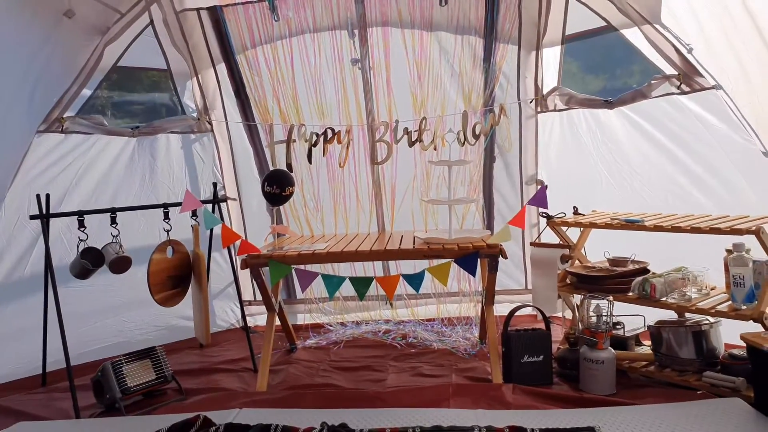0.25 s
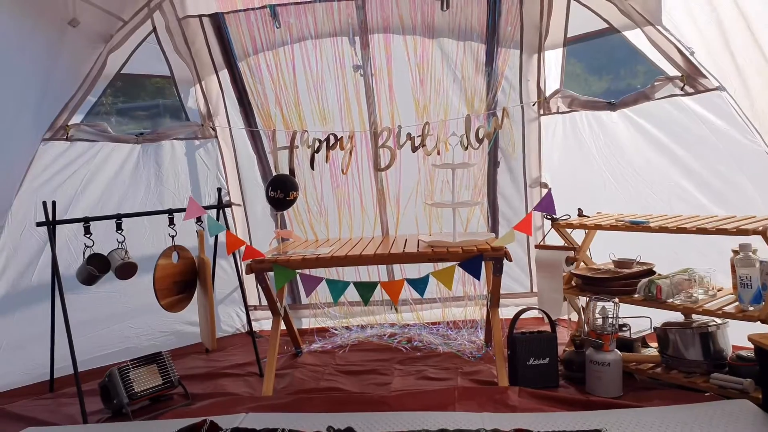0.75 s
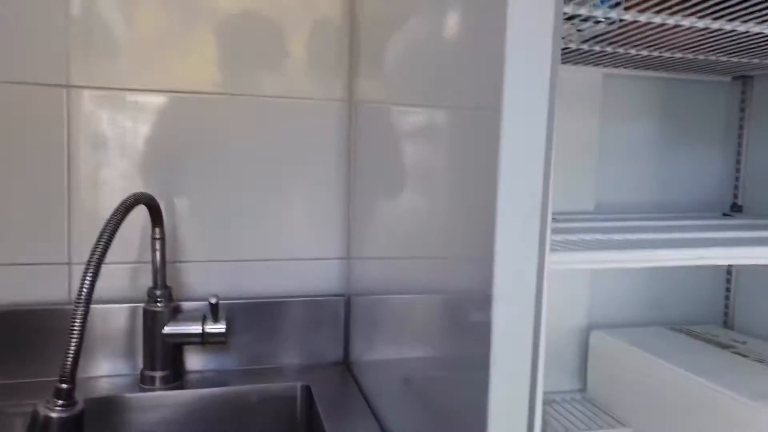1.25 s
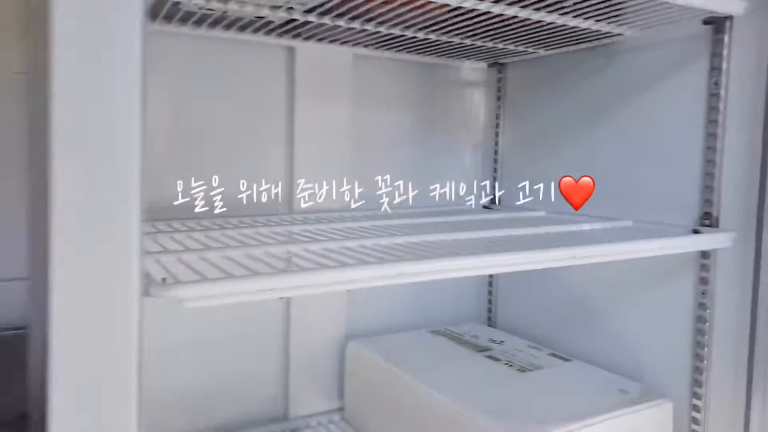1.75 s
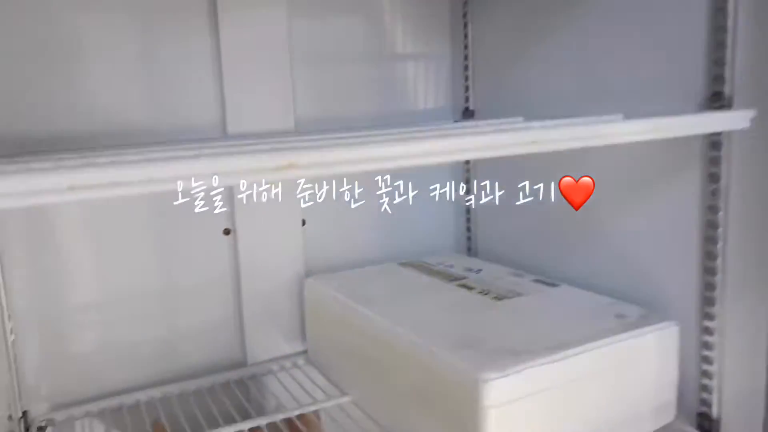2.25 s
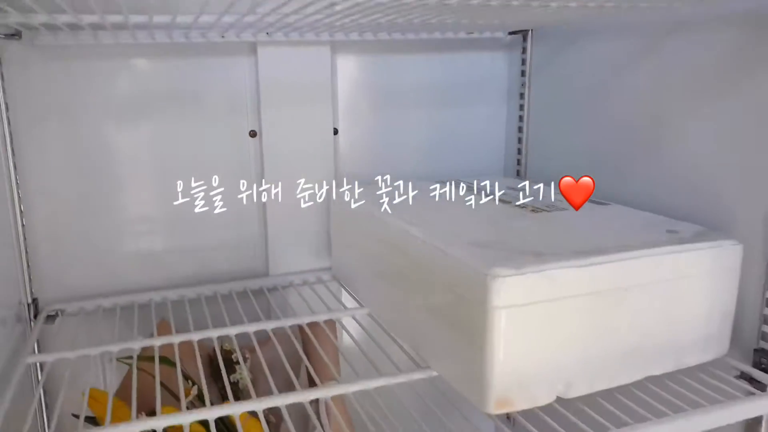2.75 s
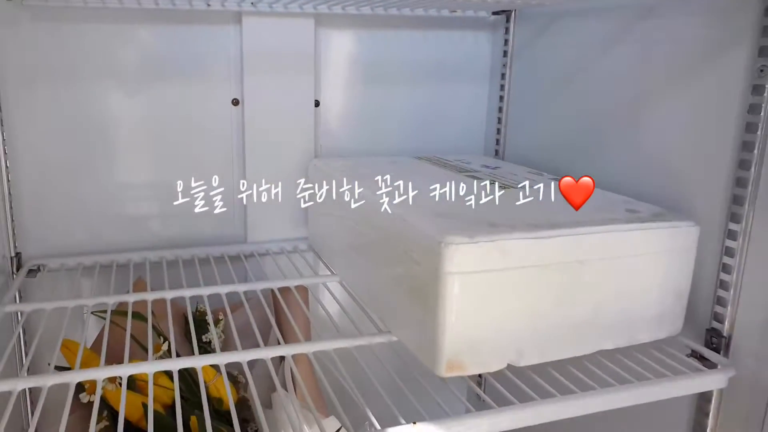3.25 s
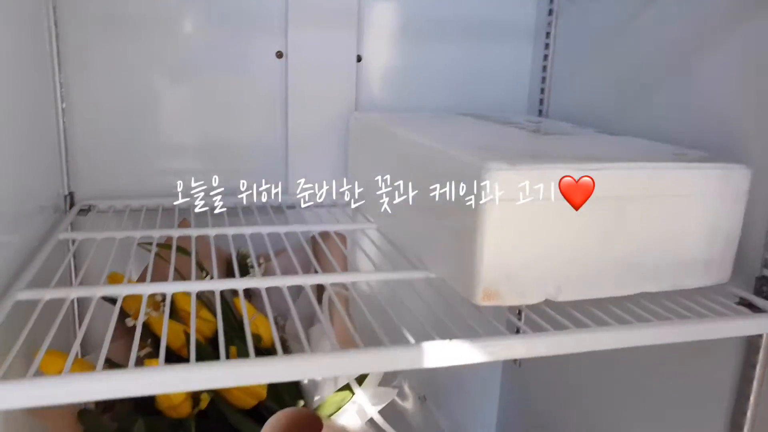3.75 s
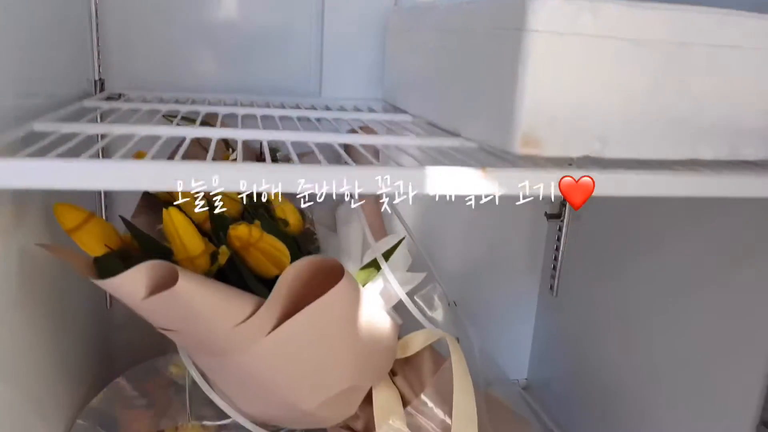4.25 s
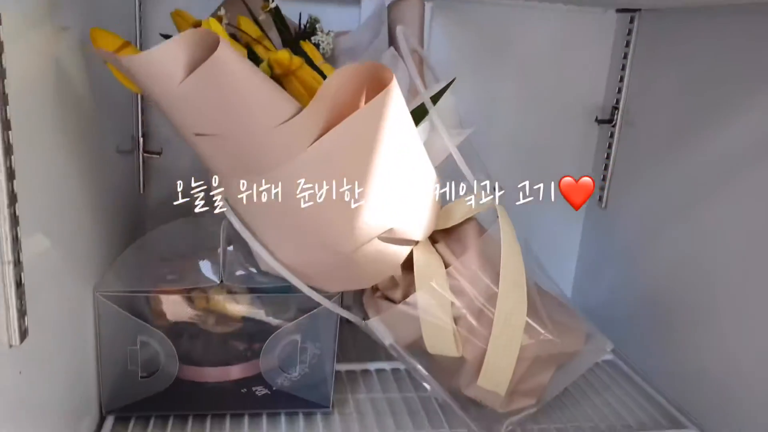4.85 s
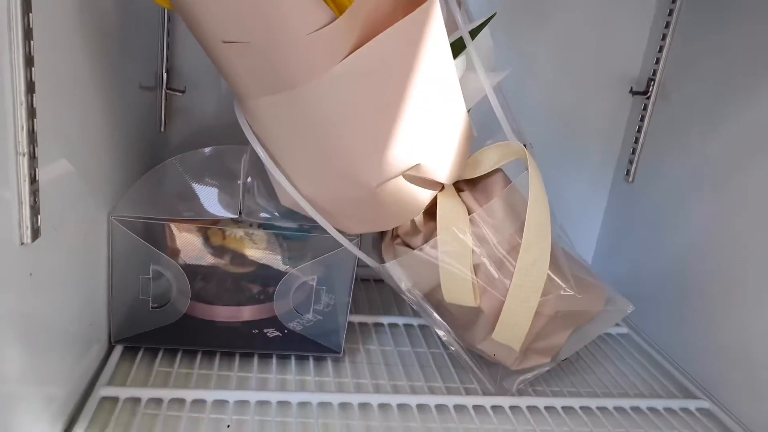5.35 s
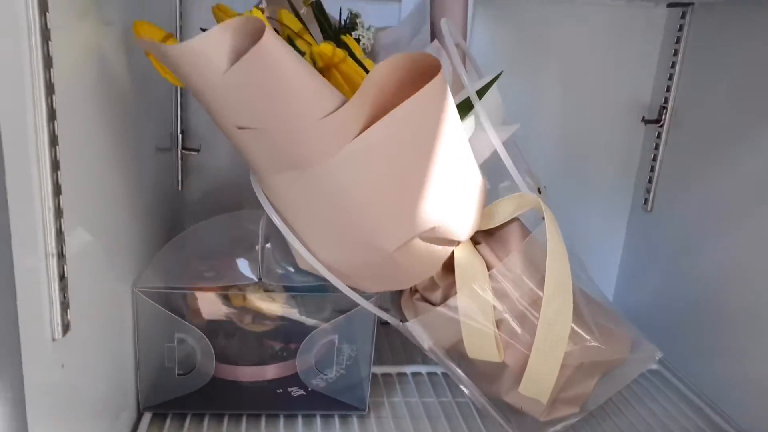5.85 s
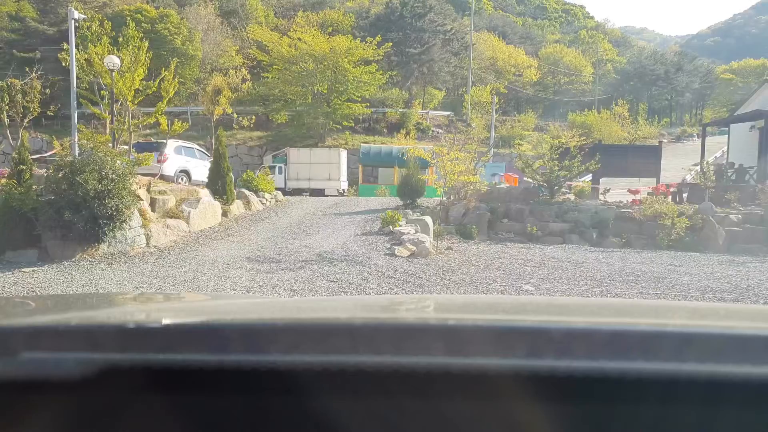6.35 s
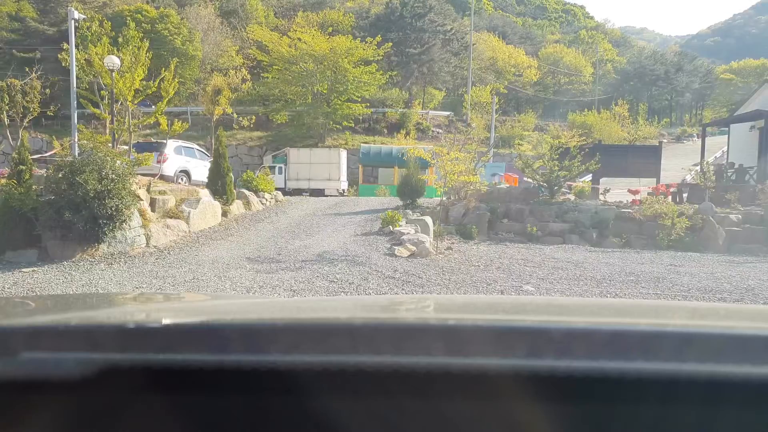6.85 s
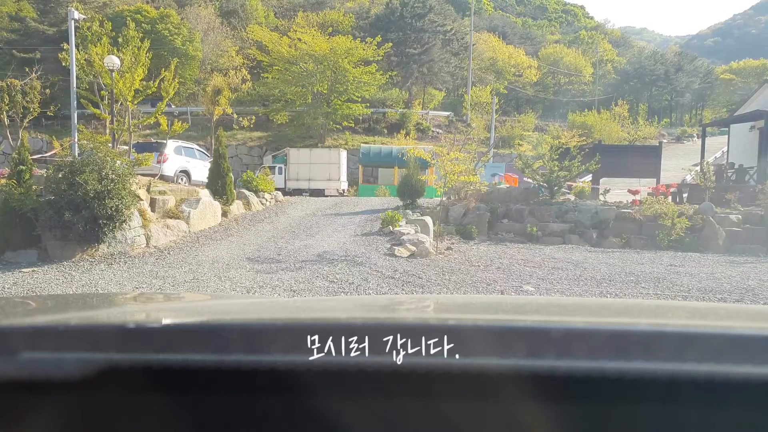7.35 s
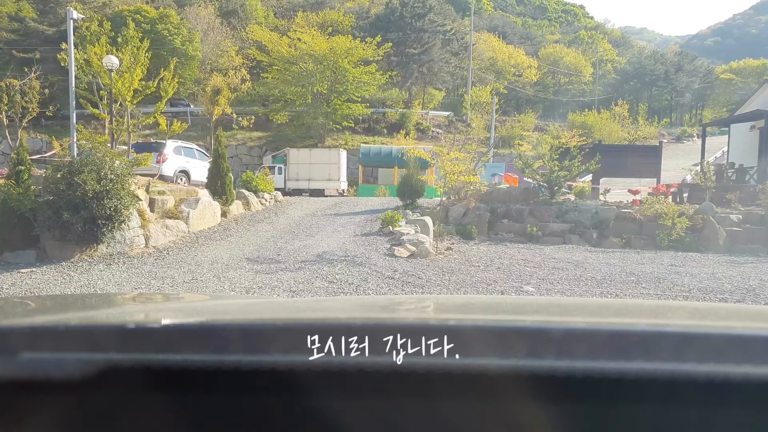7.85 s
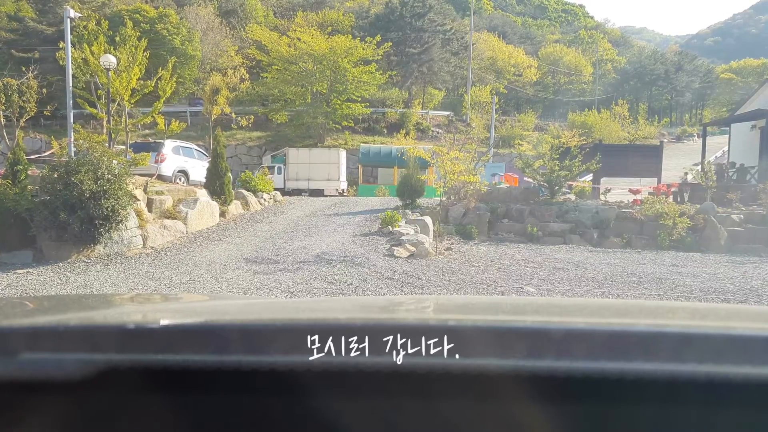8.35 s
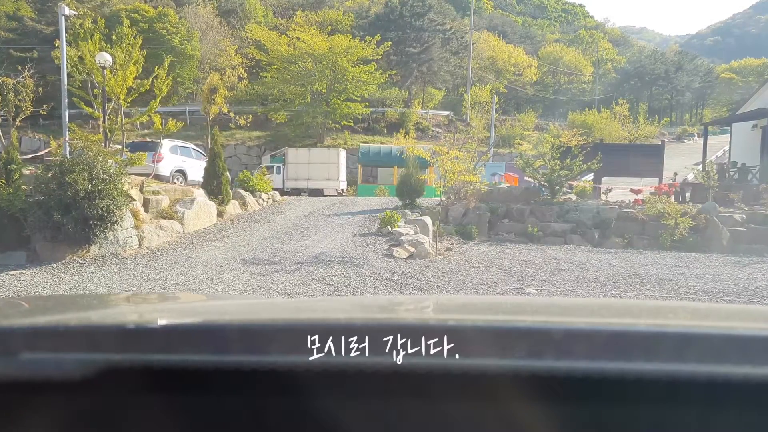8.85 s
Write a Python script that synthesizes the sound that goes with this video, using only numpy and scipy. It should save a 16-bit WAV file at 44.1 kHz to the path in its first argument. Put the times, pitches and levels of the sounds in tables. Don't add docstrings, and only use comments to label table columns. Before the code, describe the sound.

Handheld stereo microphone, three places cut hard together. First a quiet tent, wind puffs thumping the left side over a far murmur and tiny fabric ticks. Then the mic moves into an open commercial refrigerator: loud boomy compressor hum, fan tones and rushing air. Finally a parked car cabin, engine idling low while someone settles with rustle and padded thuds, clicks a switch, and the engine revs once and falls back.

```python
import sys
import numpy as np
from scipy import signal
from scipy.fft import rfft, irfft, next_fast_len
from scipy.io import wavfile
from scipy.ndimage import uniform_filter1d

SR = 44100
rng = np.random.default_rng(int(sys.argv[2]) if len(sys.argv) > 2 else 0)


def magnitude_from_level(level_db):
    exponent = np.asarray(level_db, float) / 20
    return 10 ** exponent


def bounce(signal):
    frames = np.transpose(np.atleast_2d(signal))
    limited = np.clip(frames, -1, 1)
    pcm = np.round(limited * 32767).astype(np.int16)
    wavfile.write(sys.argv[1], SR, pcm)


N = 400869
TIME = np.arange(N) / SR
PADDED = next_fast_len(N)
HZ = np.maximum(np.arange(PADDED // 2 + 1) * SR / PADDED, 1)
TO_FRIDGE_S, TO_CAR_S = 1.023, 5.852


def in_time(rows):
    s, *columns = np.transpose(rows)
    return [np.interp(TIME, s, column) for column in columns]


def at_hz(points):
    hz, value = np.transpose(points)
    return np.interp(np.log(HZ), np.log(hz), value)


def rms_one(x):
    return x / np.sqrt(np.mean(x ** 2) + 1e-20)


def bump(centre_s, width_s):
    return np.exp(-((TIME - centre_s) / width_s) ** 2)


def resonance_db(hz, modes):
    return sum(db / (1 + (2 * (hz - top_hz) / width) ** 2) for top_hz, width, db in modes)


def drift(rate):
    r = np.exp(-80 * np.pi * rate / SR)
    coarse = rng.standard_normal(N // 40 + 2002)
    slow = signal.lfilter([1], [1, -2 * r, r * r], coarse)[2000:]
    return np.interp(np.arange(N) / 40, np.arange(len(slow)), rms_one(slow))


def port_gains(left_db, right_db):
    return magnitude_from_level(np.array([[left_db], [right_db]]))


def at_ports(x, lead_s):
    return np.array([np.interp(TIME + shift, TIME, x) for shift in (lead_s / 2, -lead_s / 2)])


def stereo_noise(colour_db, likeness, edges_hz=(), lead=0):
    opposite = np.array([[1], [-1]])
    mid, side = rfft(rng.standard_normal((2, PADDED))) * magnitude_from_level(colour_db)
    alike = np.clip(likeness, -.999, .999)
    pair = np.sqrt(1 + alike) * mid + np.sqrt(1 - alike) * side * opposite
    pair = pair * np.exp(.5j * lead * opposite)
    below = [0] + [1 / (1 + (HZ / edge) ** 8) for edge in edges_hz] + [1]
    return [rms_one(irfft(pair * (top - low), PADDED)[:, :N]) for low, top in zip(below, below[1:])]


def tone(hz, level_db, wobble_db=1.5, waver=.002, rate=3.0):
    turns = np.cumsum(hz * (1 + waver * drift(rate))) / SR + rng.random()
    return np.sqrt(2) * magnitude_from_level(level_db + wobble_db * drift(rate)) * np.sin(2 * np.pi * turns)


def strike(events, modes, spread_db):
    at = [min(round(row[0] * SR), N - 1) for row in events]
    hit_db = np.array(events)[:, 1]
    chance = rng.standard_normal((len(at), len(modes)))
    out = np.zeros(N)
    for k, (hz, level_db, t60) in enumerate(modes):
        clicks = np.full(N, 1e-18)
        clicks[at] = magnitude_from_level(hit_db + level_db + spread_db * chance[:, k]) * (-1) ** k
        r, w = magnitude_from_level(-60 / (t60 * SR)), 2 * np.pi * hz / SR
        out += signal.lfilter([0, np.sin(w)], [1, -2 * r * np.cos(w), r * r], clicks)
    return out


def bursts(times, levels_db, t60):
    clicks = np.full(N, 1e-18)
    clicks[np.minimum(np.round(np.array(times) * SR).astype(int), N - 1)] = magnitude_from_level(np.array(levels_db))
    return signal.lfilter([1], [1, -magnitude_from_level(-60 / (t60 * SR))], clicks)


# frequency [Hz], density [dB per Hz].
TENT_AIR = [(100, -6), (200, 0), (300, -1), (380, -8), (700, -11), (1100, -14), (2000, -19), (2600, -28),
            (4000, -33), (7000, -38), (8500, -33), (15900, -34)]
# frequency [Hz], likeness [-1 to 1].
TENT_LIKENESS = [(60, 0.39), (180, 1), (550, 0.63), (1650, 0.63), (4970, 0.01), (15000, 0.01)]
# start [s], peak level [dB].
TENT_TICKS = [
    (0.2409, -53),
    (0.2708, -59),
    (0.3656, -73),
    (0.5082, -55.5),
]


def tent_air():
    murmur, canvas, hiss = stereo_noise(at_hz(TENT_AIR), at_hz(TENT_LIKENESS), edges_hz=[900, 4500])
    lull_db = -5.5 * bump(0.49, 0.083)
    rise_db = 6 * np.minimum(TIME, TO_FRIDGE_S)
    murmur_db = -55 + lull_db + rise_db + 8.0 * np.exp(-TIME / .05) + 3.2 * drift(8.3)
    canvas_db = -65.5 + lull_db + 8 * np.exp(-TIME / .2) + 1.5 * drift(14)
    ticks = bursts(*np.transpose(TENT_TICKS), t60=0.028)
    hiss = hiss * (magnitude_from_level(-69) + 0.37 * ticks) * port_gains(1.5, -1.5)
    return murmur * magnitude_from_level(murmur_db) + canvas * magnitude_from_level(canvas_db) + hiss


# start [s], peak level [dB].
PUFFS = [(.058, -28), (.105, -33.5), (.275, -38), (0.319, -42), (0.368, -34.5), (.405, -46), (0.459, -42),
         (.495, -43), (0.524, -36), (0.556, -31), (0.639, -33.5), (0.784, -35), (.875, -32), (0.892, -41)]
# frequency [Hz], level [dB], t60 [s].
PORT = [(58, 0.5, 0.2), (86.4, -7, 0.12)]


def wind():
    breeze_colour = [(20, -30), (50, -8.0), (75, 9.0), (130, 3), (300, -37.5)]
    breeze, = stereo_noise(at_hz(breeze_colour), 0.36)
    wake = magnitude_from_level(-55.5) + magnitude_from_level(-28) * 4 * bursts(*np.transpose(PUFFS), t60=0.1)
    soften = signal.butter(4, 200, fs=SR, output="sos")
    gusts = signal.sosfilt(soften, strike(PUFFS, PORT, spread_db=5.0))
    return breeze * wake + gusts * port_gains(-2.5, -13.0)


def tent():
    return tent_air() + wind()


# time [s], place [0 beside the door, 1 doorway, 2 upper, 3 lower shelf].
PATH = [(1.03, 0.0), (1.3, 0.75), (1.6, 1.05), (2.2, 2), (3.0, 2.5), (4.1, 2.5), (4.7, 3.5), (5.85, 3.0)]


def along_path(levels_db):
    place, = in_time(PATH)
    return np.interp(place, range(4), levels_db)


# delay [s], reflection [ratio].
SHELF_ECHOES = [
    (.0019, 0.33),
    (.0043, 0.28),
    (.0081, .25),
]


def moving_echoes(x):
    wet = x
    for lag, reflection in SHELF_ECHOES:
        late = TIME - lag * (1 + 0.1186 * drift(0.61))
        wet = wet + reflection * np.array([np.interp(late, TIME, side) for side in x])
    return rms_one(wet)


# frequency [Hz], density [dB per Hz].
FRIDGE_AIR = [(25, -14), (100, -4), (200, 0), (270, -1), (340, -7), (460, -14.5), (700, -15), (1000, -17.5),
              (1400, -18.5), (1900, -25), (3500, -32), (7000, -40), (11000, -37), (15900, -41)]
# frequency [Hz], width [Hz], lift [dB].
CABINET = [(148, 12, 5), (213, 35, 6), (85, 30, -3), (302, 40, 8), (347, 30, -5), (382, 25, 4),
           (625, 50, 7), (760, 60, 2), (950, 90, 2), (2050, 250, 2), (3300, 500, 2)]
# frequency [Hz], likeness [-1 to 1].
FRIDGE_LIKENESS = [(30, .84), (60, .95), (130, .97), (280, .97), (340, .75), (450, .7), (600, .72),
                   (780, .55), (950, .35), (1100, .6), (1600, .55), (1950, .35), (2300, .3), (3100, .3),
                   (4200, -.15), (6000, 0)]
# frequency [Hz], lead [radians].
FRIDGE_LEAD = [(60, .05), (130, .16), (260, -.07), (690, .3), (950, -1.3), (1210, -3.1), (1720, -2.6),
               (2240, .1)]
# [dB, dB, dB, dB].
AIR_AT = [
    (-31, -32.5, -30, -31),
    (-44, -43, -39, -39),
    (-51, -48.5, -48, -49.5),
    (-62.5, -55.5, -53, -54),
    (-60.5, -56.5, -55.5, -57),
]
# [dB, dB, dB, dB].
WHIR_AT = (-43, -51.5, -89, -90)


def cabinet_air():
    colour_db = at_hz(FRIDGE_AIR) + resonance_db(HZ, CABINET)
    bands = stereo_noise(colour_db, at_hz(FRIDGE_LIKENESS), edges_hz=[340, 800, 1700, 4000],
                         lead=at_hz(FRIDGE_LEAD))
    bands[0] = bands[0] * magnitude_from_level(-11 * np.clip((1.175 - TIME) / 0.066, 0, 1))
    bands[2:4] = [moving_echoes(band) for band in bands[2:4]]
    trims_db = [-1.0, 2.0, 4.0, 3.0, 5.5]
    flickers_db = [2.06, 0.63, 1.7, 1.3, 0.38]
    gusts = drift(9.5)
    air = 0
    for band, places_db, trim_db, flicker_db in zip(bands, AIR_AT, trims_db, flickers_db):
        flicker = 0.28 * gusts + drift(33) + 0.46 * drift(2.1)
        air = air + band * magnitude_from_level(along_path(places_db) + trim_db + flicker_db * flicker)
    whir, = stereo_noise(at_hz([(700, -30), (1020, -8), (1120, 0), (1250, -9), (1800, -30)]), -.5)
    return air + whir * magnitude_from_level(along_path(WHIR_AT))


# start [s], peak level [dB].
SHELF_TICKS = [
    (1.778, -46.5),
    (2.676, -46.5),
    (3.805, -46),
]


def shelf_ticks():
    wire, = stereo_noise(at_hz([(1200, -14), (3500, -12), (4600, 0), (5500, -14), (12000, -20)]), .4)
    return wire * bursts(*np.transpose(SHELF_TICKS), t60=0.12)


# frequency [Hz], level [dB rms].
WHINE = [(1993, -66)]
# time [s], half width [s],
# frequency [Hz], level [dB rms].
PANEL_RINGS = [(1.17, .07, 530, -45), (1.37, .09, 612, -44), (1.2, .07, 950, -52), (1.2, 0.093, 1135, -49),
               (1.41, .05, 1060, -51), (2.8, 0.7, 630.3, -44), (2.9, 0.35, 700, -51.5),
               (5.1, 0.087, 955, -49), (3.66, 0.69, 391, -45), (1.7, .4, 2160, -61),
               (4.5, 0.21, 284, -35.5), (5.65, 0.1, 305.6, -35.5)]


def panel_whine():
    whine = sum(tone(np.full(N, hz), db, waver=.0005) for hz, db in WHINE)
    for s, width, hz, db in PANEL_RINGS:
        passing_db = -7.3 * ((TIME - s) / width).clip(-4, 4) ** 2
        whine = whine + tone(np.full(N, hz), db + passing_db, wobble_db=4.5, waver=0.0124, rate=25.1)
    return whine * [[1], [.5]]


# [dB rms, dB rms, dB rms, dB rms].
MOTORS_AT = [
    (52.4, -57, -57, -54, -47),
    (58.84, -38, -34, -31.5, -35),
    (113.8, -37.5, -40, -33, -34.5),
    (118.26, -60, -47, -34, -40),
    (121.6, -59, -48, -43.5, -38.5),
    (236.7, -45.5, -44.5, -43, -39.5),
]
# [dB, dB, dB, dB].
FAR_FAN_AT = (-62, -33, -34, -44)


def motor_hum():
    hum = sum(tone(np.full(N, hz), along_path(db), wobble_db=.5, waver=.0004) for hz, *db in MOTORS_AT)
    far_hz = 209.6 - 0.753 * (TIME - TO_FRIDGE_S)
    far_fan = tone(far_hz, along_path(FAR_FAN_AT), wobble_db=1.8, waver=.005, rate=6.0)
    return at_ports(hum + far_fan, .0002)


# time [s], frequency [Hz].
FAN_HZ = [(1.03, 190), (1.6, 191), (2.7, 195.3), (4.2, 195.8), (4.6, 194.3), (5.85, 196.3)]
# [dB, dB, dB, dB].
FAN_AT = [
    (-54, -38, -37, -37),
    (-60, -49.5, -53, -50.5),
    (-60, -47.5, -40.5, -39),
]


def fan_blades():
    blade_hz, = in_time(FAN_HZ)
    shade_db = -6.5 * bump(4.54, 0.28)
    blades = 0
    for k, places_db in enumerate(FAN_AT):
        level_db = along_path(places_db) + shade_db * k / 2
        blades = blades + tone((k + 1) * blade_hz, level_db, wobble_db=2.0, waver=.003, rate=7.0)
    return at_ports(blades, .00012)


def fridge():
    steady = (cabinet_air() + motor_hum()) * port_gains(-.25, .25)
    return steady + fan_blades() * port_gains(-1.1, 1.1) + panel_whine() + shelf_ticks()


# frequency [Hz], density [dB per Hz].
SELF_NOISE = [(1500, -20), (2500, -3), (7000, -5), (8500, -1), (15900, 0)]


def self_noise():
    hiss, = stereo_noise(at_hz(SELF_NOISE), 0)
    return magnitude_from_level(-80) * hiss


# frequency [Hz], density [dB per Hz].
RUSTLE_COLOUR = [(590, -46), (1000, -24), (1160, 0.5), (1340, -9), (2000, -11), (2600, -19), (3400, -11),
                 (10700, -7.5), (15900, -6.5)]
# start [s], length [s], level [dB].
RUBS = [
    (5.854, 0.07, -64.5),
    (6.036, .015, -81),
    (6.09, 0.097, -81),
    (6.21, 0.022, -77),
    (6.16, .04, -82),
]


def seat_rustle():
    cloth, = stereo_noise(at_hz(RUSTLE_COLOUR), 0.17)
    rubs = 0
    for s, length, db in RUBS:
        rise_db = 700 * np.clip(s - TIME, 0, 1)
        fall_db = 226 * np.clip(TIME - s - length, 0, 1)
        rubs = rubs + magnitude_from_level(db - rise_db - fall_db)
    return cloth * rubs * magnitude_from_level(11.5 + 1.6 * drift(60))


# start [s], body level [dB], crack level [dB].
THUDS = [(5.861, -60, -59), (5.892, -40, -41), (6.05, -41, -53), (6.16, -36, -56), (6.202, -24, -44),
         (6.215, -19, -41), (6.231, -17, -43), (6.265, -23, -52), (6.298, -27, -60), (6.325, -30, -70),
         (8.815, -30.5, -75)]
# frequency [Hz], level [dB], t60 [s].
THUD_BODY = [(100, -5, 0.1), (178, 3, 0.12), (280, -3, 0.1), (415, -6, 0.08), (1190, -28, 0.071),
             (2050, -32, 0.04)]
# start [s], level [dB].
GRIT = [
    (6.16, -74),
    (6.18, -74),
    (6.21, -66),
    (6.221, -64),
    (6.232, -65),
    (6.262, -75),
]
# start [s], level [dB].
SEAT_KNOCKS = [
    (5.859, -27),
    (5.876, -29),
    (5.890, -27),
    (5.897, -26),
    (5.912, -31),
]
# frequency [Hz], level [dB], t60 [s].
SEAT_BODY = [(62, -7, .15), (104, 1, 0.15), (235, 0, 0.08), (320, -2, .07), (393, -4, 0.075)]
# frequency [Hz], level [dB], t60 [s].
SEAT_SWAY = [
    [(6.243, -24)],
    [(52, 0, .22)],
]
# frequency [Hz], level [dB], t60 [s].
SQUEAKS = [
    [(6.149, -61), (6.158, -59), (6.166, -61)],
    [(1750, 0, .05)],
]


def seat_thuds():
    soften = signal.butter(2, 1500, fs=SR, output="sos")
    padded = signal.sosfilt(soften, strike(THUDS, THUD_BODY, spread_db=2.5))
    scuff, = stereo_noise(at_hz([(300, -24.0), (700, 10.5), (2200, -9), (2450, -30), (15000, -52)]), .1)
    grit, = stereo_noise(at_hz([(1500, -20), (2500, 0), (4500, -3), (6500, -14), (15000, -30)]), .1)
    thud_s, _, crack_db = np.transpose(THUDS)
    thuds = padded * magnitude_from_level(-3.0) + scuff * bursts(thud_s, crack_db, t60=0.1)
    thuds = thuds + grit * bursts(*np.transpose(GRIT), t60=0.1)
    seat = strike(SEAT_KNOCKS, SEAT_BODY, spread_db=1.5) + strike(*SEAT_SWAY, spread_db=0)
    return thuds + seat + strike(*SQUEAKS, spread_db=1.5)


# start [s], peak level [dB].
CLICKS = [
    (7.491, -29),
    (7.4952, -31),
    (7.505, -36),
    (7.511, -41),
    (8.242, -50),
    (8.247, -52),
    (8.262, -56),
]
# frequency [Hz], level [dB], t60 [s].
SWITCH = [(1080, -3, .03), (1416, 1, .06), (2616, -10, .4), (3031, -11.5, .22), (3461, -14, .18),
          (3531, -10, .17), (3720, -7, .17), (4064, -11, .15)]
# frequency [Hz], density [dB per Hz].
CLICK_COLOUR = [(600, -30), (1100, -12), (1500, -9), (2050, 0), (2400, -12), (3500, -12), (7200, -26),
                (8400, -24), (15900, -29)]


def switch():
    snap, = stereo_noise(at_hz(CLICK_COLOUR), 0.19)
    click_s, click_db = np.transpose(CLICKS)
    snaps = bursts(click_s, click_db - 9, t60=0.041) + bursts(click_s, click_db - 31.5, t60=0.25)
    plastic = magnitude_from_level(-16) * strike(CLICKS[1:2], SWITCH, spread_db=0)
    lever = strike(CLICKS[1:], [(2030, -7.5, .03)], spread_db=1)
    return snap * snaps + plastic + lever


# time [s], speed [turns per s].
CRANK = [(5.86, 24.2), (6.26, 24.6), (6.8, 24.1), (7.32, 24.1), (7.49, 24.7), (7.65, 26.7), (8.0, 32),
         (8.11, 33.4), (8.27, 34.6), (8.41, 34.3), (8.58, 33), (8.68, 30.3), (8.8, 27.4), (8.9, 26.6),
         (9.09, 28.2)]


def crank_motion():
    crank_hz, = in_time(CRANK)
    octaves = np.log2(crank_hz / 24.2)
    pull = uniform_filter1d(np.gradient(crank_hz) * SR / 10, size=SR // 8)
    return crank_hz, octaves, pull, np.clip(1 - 10 * octaves, 0, 1)


def trim_buzz():
    _, octaves, _, _ = crank_motion()
    buzz, = stereo_noise(at_hz([(3600, -40), (3790, -8), (3890, 0), (3980, -6), (4200, -40)]), .3)
    return buzz * magnitude_from_level(-94.5 + 13 * octaves + 2.0 * drift(15))


# delay [s], reflection [ratio].
WALL_ECHOES = [(.0047, .1), (.0073, .11), (.0119, .13), (.0173, .15), (.0291, .18)]


def echoes_db():
    ripple_db = 0
    for lag, reflection in WALL_ECHOES:
        ripple_db = ripple_db - 20 * np.log10(abs(1 - reflection * np.exp(-2j * np.pi * HZ * lag)))
    return ripple_db * at_hz([(700, 0), (1100, 1)])


# frequency [Hz], density [dB per Hz].
RUMBLE = [(25, -5), (90, -2), (200, -13.5), (270, -7.5), (335, -20.5), (415, -11.5), (490, -25.5),
          (590, -20.5), (800, -39), (1050, -46), (1450, -52.5), (2150, -66), (2400, -77.5), (4000, -78.5)]
# frequency [Hz], likeness [-1 to 1].
CAR_LIKENESS = [(40, 0.92), (150, 0.6), (280, 0.58), (340, 0.47), (400, 0.23), (520, 0.7), (700, 0.3),
                (850, 0.3), (1050, 0.96), (1300, 0.42), (1600, 0.3), (2500, 0.01)]
# frequency [Hz], lead [radians].
CAR_LEAD = [(60, 0), (130, -.2), (260, -.1), (500, -.75), (800, -1.5), (1050, -3), (2500, -3.1)]


def engine_rumble():
    crank_hz, octaves, pull, idling = crank_motion()
    angle = 2 * np.pi * np.cumsum(crank_hz) / SR
    throb_db = 1.5 * np.cos(angle / 2) + 2.6 * np.cos(angle)
    throb_db = throb_db + 0.79 * np.cos(2 * angle) + 2.5 * np.cos(4 * angle)
    rattle_db = .6 * throb_db + 2.5 * idling * np.cos(angle / 4 - .6)
    rattle_db = rattle_db - 22.5 + 2.27 * 5.4 * octaves
    deep, body, rattle = stereo_noise(at_hz(RUMBLE) + echoes_db(), at_hz(CAR_LIKENESS),
                                      edges_hz=[300, 1000], lead=at_hz(CAR_LEAD))
    rumble_db = -43.5 + 9 * octaves + pull
    return magnitude_from_level(rumble_db) * (magnitude_from_level(3.0) * deep + magnitude_from_level(throb_db) * body + magnitude_from_level(rattle_db) * rattle)


# frequency [Hz], level [dB rms].
CABIN_BOOM = [(24, -50.5), (26, -42), (27.5, -36.5), (29.5, -29), (33, -24.5), (36, -25.5), (48, -31),
              (53, -31.5), (56, -28.5), (58.5, -28), (61.5, -38.5), (65, -27), (69, -23.5)]
# frequency [Hz], width [Hz], lift [dB].
CABIN_MODES = [(108, 22, 4.5), (220, 30, 6)]
# multiple of crank speed, level [dB rms].
UPPER_ORDERS = [(1.5, -45), (2.5, -63), (4, -48.5), (5, -49), (6, -54), (7, -47.5), (8, -54), (9, -55.5),
                (10, -55), (12, -56.5)]


def engine_boom():
    crank_hz, octaves, pull, idling = crank_motion()
    hunt_db = 2 * np.cos(2 * np.pi * (TIME - 7.01) / 0.87) * idling
    cabin_hz, cabin_db = np.transpose(CABIN_BOOM)
    first_db, second_db = (np.interp(k * crank_hz, cabin_hz, cabin_db) + hunt_db for k in (1, 2))
    first_db = np.interp(TIME - .03, TIME, first_db)
    warm_db = 8.5 * np.exp(-abs(TIME - TO_CAR_S) / 0.31)
    third_db = -43.5 + resonance_db(3 * crank_hz, CABIN_MODES) + hunt_db + warm_db
    boom = tone(crank_hz, first_db, wobble_db=1.2)
    boom = boom + tone(2 * crank_hz, second_db + 0.4 * pull, wobble_db=.5, waver=.004)
    boom = boom + tone(3 * crank_hz, third_db, wobble_db=4.0, waver=.012, rate=5.4)
    load_db = 5.4 * octaves + 1.5 * pull
    for k, db in UPPER_ORDERS:
        order_db = db + load_db + resonance_db(k * crank_hz, CABIN_MODES)
        boom = boom + tone(k * crank_hz, order_db, wobble_db=2, waver=.003, rate=4.0)
    return at_ports(boom, -.0007) * port_gains(.3, -.3)


def car():
    cabin = self_noise() + seat_rustle() + seat_thuds() + switch()
    return cabin + trim_buzz() + engine_rumble() + engine_boom()


def scene():
    indoors, seated = (np.clip((TIME - cut) / .004, 0, 1) for cut in (TO_FRIDGE_S, TO_CAR_S - .003))
    return (1 - indoors) * tent() + (indoors - seated) * fridge() + seated * car()


def roll_off(x):
    return signal.sosfilt(signal.butter(12, 16020, fs=SR, output="sos"), x)


def record(dry):
    mix = signal.sosfilt(signal.butter(2, 15, "high", fs=SR, output="sos"), dry)
    mix = signal.sosfilt(signal.ellip(10, .5, 70, 15720, fs=SR, output="sos"), mix)
    return roll_off(mix)


dry = scene()
out = record(dry)
bounce(out)
```